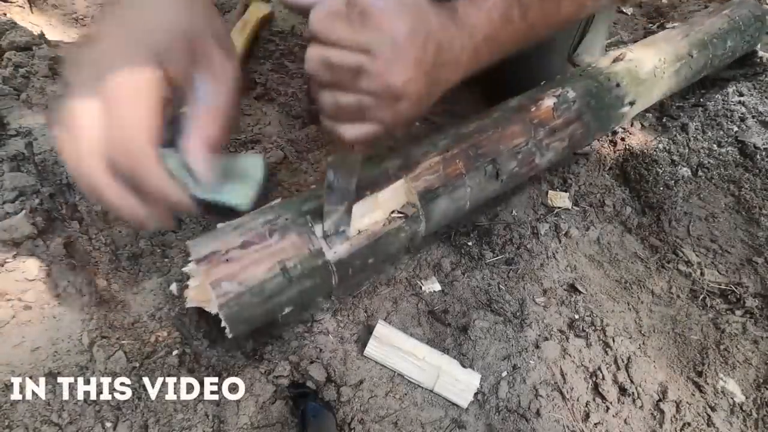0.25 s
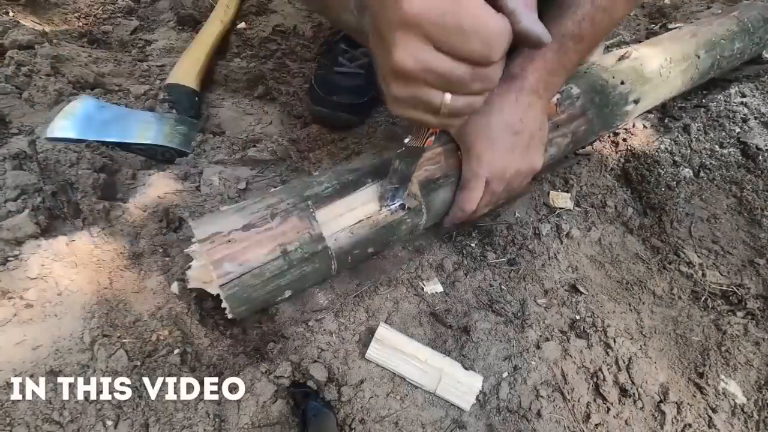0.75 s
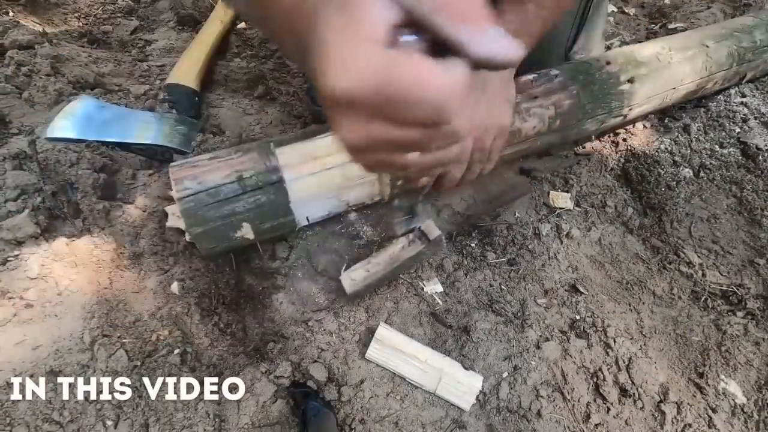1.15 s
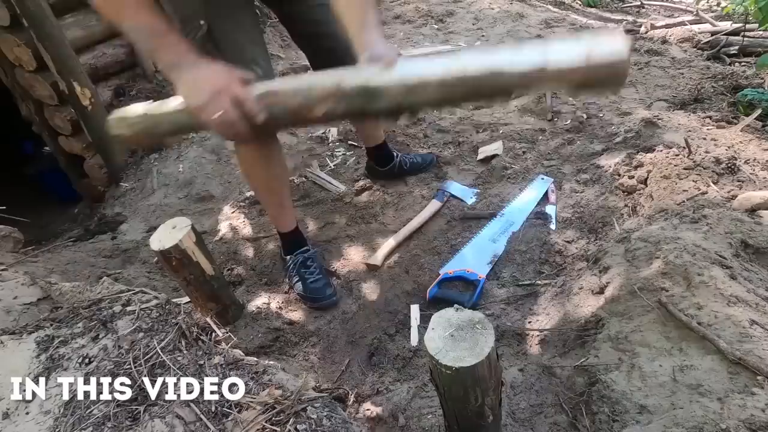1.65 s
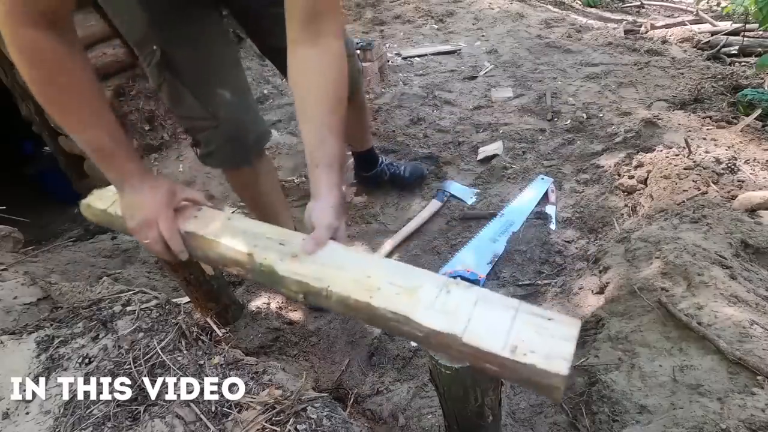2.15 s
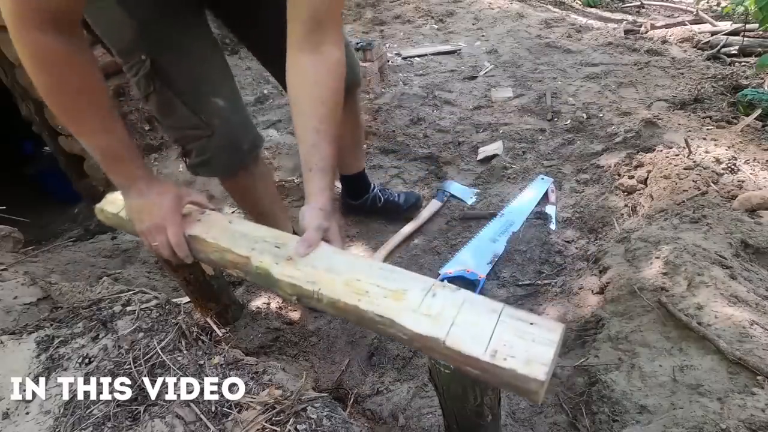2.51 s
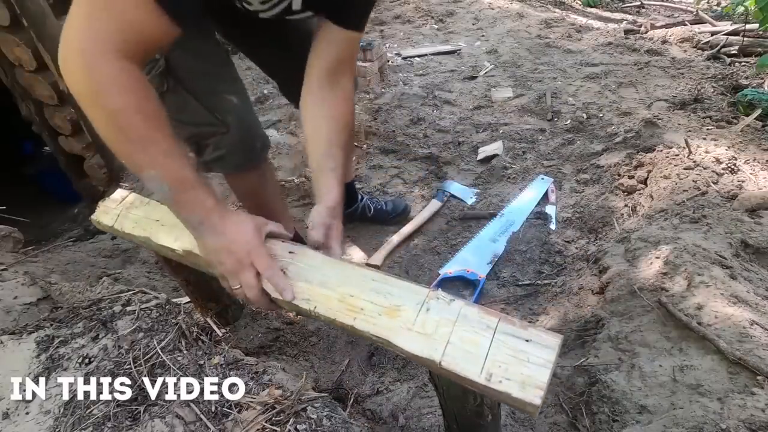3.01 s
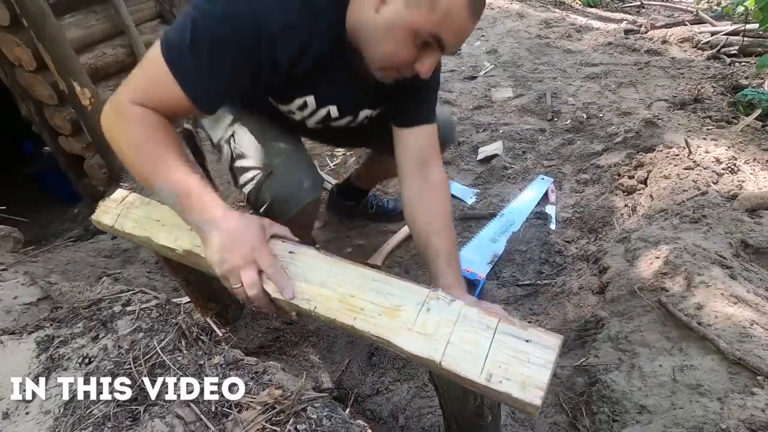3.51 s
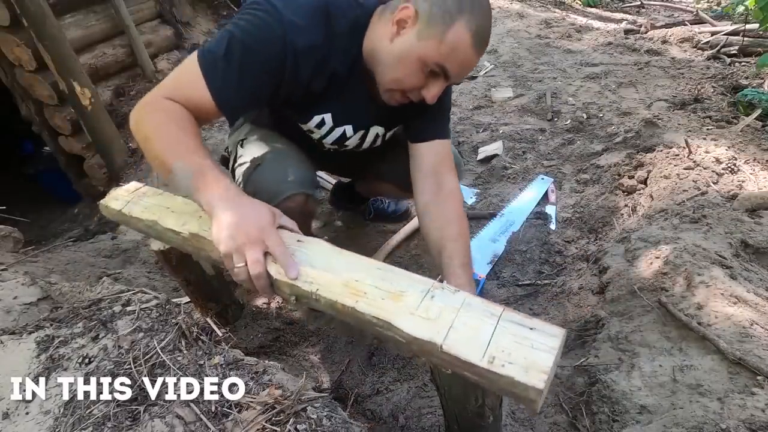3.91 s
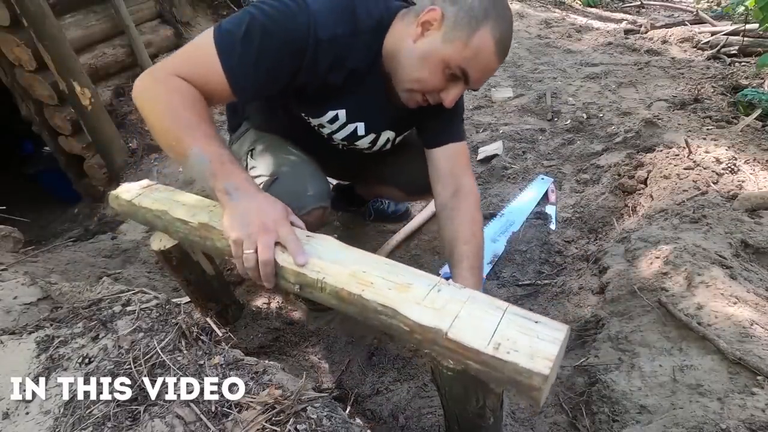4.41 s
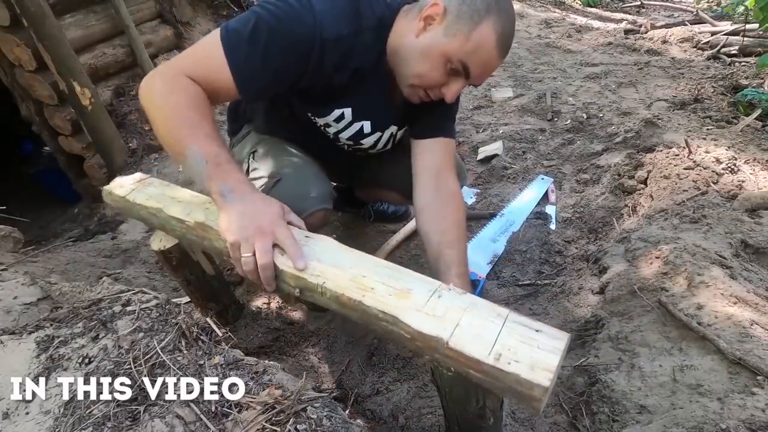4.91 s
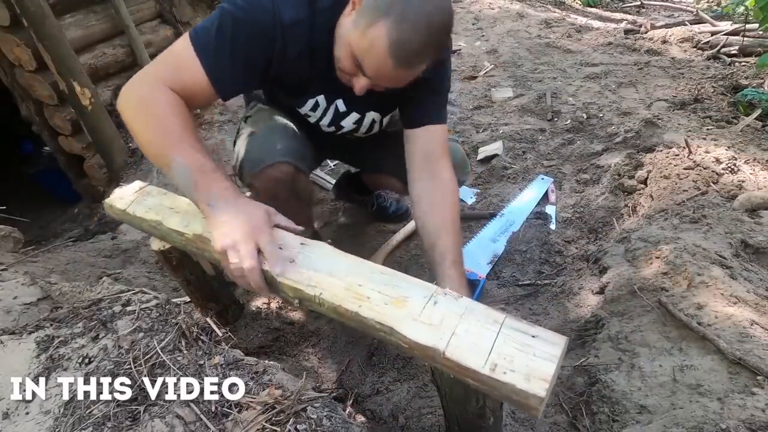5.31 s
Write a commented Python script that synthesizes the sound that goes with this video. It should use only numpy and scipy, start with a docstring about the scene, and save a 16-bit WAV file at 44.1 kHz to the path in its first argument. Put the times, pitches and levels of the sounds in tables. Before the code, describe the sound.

A chisel tears a block from a log with a loud snap, then a heavy beam knocks and rubs onto stumps in a quiet forest.

```python
"""A quiet forest murmurs around woodwork on bare earth, close by, amid scuffs and rustling clothes.
A chisel levers a block out of a notched log: fibres tick, tear and snap, and the block drops.
Then a hewn beam is set on two stumps, rocked and knocked into its seat, rubbing on hands and bark.
Solid bodies are sums of damped modes, soil thuds are heavily damped swings, and tearing, scraping
and crunching are dense random clicks filtered by the material."""
import sys
import numpy as np
from scipy import signal
from scipy.fft import rfft, irfft
from scipy.io import wavfile

SR = 44100
rng = np.random.default_rng(int(sys.argv[2]) if len(sys.argv) > 2 else 0)


def wav_record(signal):
    """Record a signal, one row per channel, as 16-bit PCM in the file named by sys.argv[1]."""
    frames = np.transpose(np.atleast_2d(signal))
    bounded = np.clip(frames, -1, 1)
    # unit amplitude maps onto the largest positive 16-bit level
    quanta = np.round(bounded * 32767).astype(np.int16)
    wavfile.write(sys.argv[1], SR, quanta)


N = 244898
TIME = np.arange(N) / SR  # s
SHORT = TIME[:16384]  # s, time axis of one short event
SIZE = 4096  # samples in a filter response

# beam meets stump: (time [s], beam drive [dB], contact cut-off [Hz], contact place [share of length],
# stump drive [dB], bark crunch peak [dB], crunch centre [Hz], jolt [dB], sinking [dB], sinking pitch [Hz])
KNOCKS = [(2.257, -19.5, 908, 0.108, -36, -24, 1700, -15.5, -14.5, 124),
          (2.3356, -44, 920, 0.055, -53, -48, 1300, -31, -22.5, 118),
          (2.4340, -24.5, 2197, 0.076, -15.5, -29.5, 1400, -27, -25, 109),
          (2.567, -48, 2980, 0.043, -34, -33, 1650, -24, -26.5, 88),
          (4.1783, -42, 2520, 0.031, -33, -33, 1400, -27, -30, 92),
          (5.223, -23.5, 1950, 0.15, -10.5, -19.5, 2750, -12, -25, 76)]
# spectrum of a scrape or rustle before tilting: (frequency [Hz], level [dB])
SCUFF_COLOUR = [(100, -4), (600, -10), (1200, 2), (2000, 3.5), (3200, 3.5), (5000, 0.5), (8000, -9),
                (11000, -17.5), (16000, -36.5)]
# spectrum of trembling soil: (frequency [Hz], level [dB])
SOIL_COLOUR = [(20, -19.5), (50, -2), (110, -4.5), (220, -11), (400, -18), (900, -31), (3000, -60.5)]


def undb(db):
    """Level is logarithmic: decibels to amplitude gain."""
    return 10 ** (np.asarray(db) / 20)


def unit(x):
    """Root-mean-square normalisation: scale to rms 1."""
    return x / np.sqrt(np.mean(x ** 2))


def peak(x, db):
    """Peak normalisation: scale the largest sample to a level in dB."""
    return x * undb(db) / np.abs(x).max()


def add(out, s, x):
    """Superposition: mix x in from time s."""
    i = max(int(s * SR), 0)
    out[:, i:i + x.shape[-1]] += x[..., :max(N - i, 0)]


def through(x, response):
    """Linear filtering: convolve both channels with an impulse response."""
    return signal.fftconvolve(x, response[None], axes=1)[:, :x.shape[1]]


def colour(points, tilt=0):
    """Minimum-phase response of a (Hz, dB) spectrum, tilted by dB per octave above 500 Hz."""
    hz, db = np.transpose(points)
    f = np.maximum(np.fft.rfftfreq(SIZE, 1 / SR), 1)
    level = np.interp(np.log(f), np.log(hz), db) + tilt * np.log2(np.maximum(f / 500, 1))
    # folding the cepstrum onto positive times makes the response causal
    cepstrum = irfft(np.log(undb(level)))
    cepstrum[1:SIZE // 2] *= 2
    cepstrum[SIZE // 2 + 1:] = 0
    return irfft(np.exp(rfft(cepstrum)))


def fade(t60):
    """Exponential decay: 60 dB are lost in t60 seconds."""
    return np.exp(-np.log(1000) * SHORT / t60)


def swell(t, rise, fall):
    """Exponential growth and decay: peaks at t = 0, gains 20 dB in rise s, loses them in fall s."""
    return undb(-20 * np.maximum(-t / rise, t / fall))


def waver(rate):
    """Random modulation: normal random levels joined by straight lines, rate of them a second."""
    points = rng.standard_normal(N // 8)
    return np.interp(TIME * rate, np.arange(len(points)), points)


def wobble(hz, rise):
    """Heavily damped oscillation: the envelope peaks after rise seconds and then dies."""
    return SHORT / rise * np.exp(1 - SHORT / rise) * np.sin(2 * np.pi * hz * SHORT)


def grains(count, spread_db, side):
    """Impulsive noise: dense clicks of very uneven size, partly different in the two channels."""
    size = np.minimum(rng.exponential(size=count), 6)
    mid, diff = rng.standard_normal((2, count)) * undb(spread_db * size)
    return unit(np.array([mid + side * diff, mid - side * diff]))


def air(spectrum, db):
    """Filtered noise: faint murmur that wavers, its treble almost unrelated left and right."""
    waver_db = 1.1
    mid, side = rng.standard_normal((2, N))
    side = through(side[None], colour([(100, -5), (1400, -6.5), (4000, 1), (8000, -1)]))[0]
    murmur = unit(through(np.array([mid + side, mid - side]), colour(spectrum)))
    return murmur * undb(db + waver_db * waver(10))


def forest():
    """Background noise depends on position: one murmur at the log, then another at the beam."""
    # spectrum of the forest air at the log: (frequency [Hz], relative level [dB])
    log_air = [(15, -30), (25, -0.5), (57, -4), (93, -19.5), (172, 2), (404, -15), (529, -9), (811, -22.5),
               (1310, -10.5), (1630, -21.5), (3180, -26), (3830, -30.5), (15000, -42.5)]
    # spectrum of the forest air at the beam: (frequency [Hz], relative level [dB])
    beam_air = [(15, -37.5), (25, -0.5), (98, -10.5), (176, 3), (271, -4.5), (363, -3), (543, -3.5),
                (833, -11.5), (1150, -6), (1760, -14.5), (3090, -23.5), (5570, -25.5), (11500, -40),
                (12800, -48.5), (15000, -63.5)]
    beam_start_s = 1.734
    return np.where(TIME < beam_start_s, air(log_air, db=-70), air(beam_air, db=-62))


def friction(s, rise, fall):
    """Stick-slip: a second of jerky grit, with a swelling pressure; gives start time, grit, pressure."""
    start = max(s - .5, 0)
    grit = grains(SR, spread_db=3.0, side=.4) * undb(2.5 * waver(130)[:SR])
    return start, grit, swell(start + TIME[:SR] - s, rise, fall)


def scuffing():
    """Sliding friction: scrapes and rustles hiss and rumble, and single bits of grit and twig crack."""
    # shoes, tools and the falling block scraping soil, and clothes rustling: (time of the height [s],
    # rise by 20 dB [s], fall by 20 dB [s], level [dB], tilt [dB per octave], low rumble re the hiss [dB])
    scuffs = [(0.01, .03, .26, -62, -3, 1), (0.253, .026, .06, -59.5, 3.5, -6),
              (0.51, .12, .055, -58, -2, 2), (0.560, .025, .014, -60, -.5, -6),
              (1.07, .012, .17, -55, -5, -6), (1.27, .25, .12, -67, 0, 3),
              (1.478, .025, .065, -59.5, 1.5, -12), (1.736, .0032, .12, -54.5, 0, -22),
              (2.0, .3, .62, -64, -8, -14), (2.78, .08, .093, -68, 4.5, -12), (3.75, .35, .5, -66, 2, -15),
              (4.835, .06, .08, -45.5, -.7, -1), (5.0, .06, .1, -65, 2, -12)]
    # grit and twigs cracking: (time [s], peak [dB], t60 [s])
    ticks = [(4.578, -50.5, .014), (4.641, -50, .014), (4.6884, -33, .016), (5.0433, -35, .014),
             (5.263, -39, .045), (5.411, -42, .014), (5.44, -40, .02)]
    # spectrum of a crack: (frequency [Hz], level [dB])
    tick_colour = [(300, -42), (1200, -15), (2600, 7.5), (3700, -6.5), (5500, 0), (8000, -12), (12000, -14),
                   (16000, -23.5)]
    out, soil, click = np.zeros((2, N)), colour(SOIL_COLOUR), colour(tick_colour)
    for s, rise, fall, db, tilt, rumble_db in scuffs:
        start, grit, pressure = friction(s, rise, fall)
        hiss = unit(through(grit, colour(SCUFF_COLOUR, tilt)))
        rumble = unit(through(grit, soil))
        add(out, start, undb(db) * pressure * (hiss + undb(rumble_db) * rumble))
    for s, db, t60 in ticks:
        crack = grains(len(SHORT), spread_db=0, side=0.61) * fade(t60)
        add(out, s, peak(through(crack, click), db))
    return out


def thud(hz, cycles):
    """Scaling by period: the ground peaks after a set number of swings, so low thuds last longer."""
    return wobble(hz, cycles / hz)


def thudding():
    """Damped spring: the soil takes each load with a few slow swings and trembles on briefly."""
    # log, block or foot landing on the soil: (time [s], envelope peak of the swing [dB], pitch [Hz])
    thuds = [(0.289, -44, 88), (0.499, -30.5, 98), (0.524, -26, 72), (1.016, -26, 290), (1.03, -28, 67),
             (1.125, -32.5, 210), (1.168, -46, 118), (1.257, -44.5, 182), (2.524, -37.5, 125),
             (4.831, -26, 122)]
    soil_rise, stump_rise = .47, .56  # swings to the peak
    jolt_hz, sink_lag_s = 208, .004
    rebound_s, rebound_db = .0385, -16  # after the knock, re the sinking
    tremble_db, tremble_t60_s = -24, .26  # level re the swing
    break_to_shudder_s, shudder_db, shudder_t60_s = .02, -43, .65
    out, soil = np.zeros((2, N)), colour(SOIL_COLOUR)
    loads = [(s, db, thud(hz, soil_rise)) for s, db, hz in thuds]
    # under every knock the stump jolts, sinks into the soil and rebounds once
    for s, *_, jolt_db, sink_db, sink_hz in KNOCKS:
        sink = thud(sink_hz, stump_rise)
        loads.append((s, jolt_db, thud(jolt_hz, stump_rise)))
        loads.append((s + sink_lag_s, sink_db, sink))
        loads.append((s + rebound_s, sink_db + rebound_db, sink))
    for s, db, swing in loads:
        tremble = unit(through(grains(len(SHORT), 0, side=0.6), soil))
        tremble = tremble * fade(tremble_t60_s) * (1 - np.exp(-SHORT / .008))
        add(out, s, undb(db) * (swing + undb(tremble_db) * tremble))
    # the long log keeps shuddering on the ground after the block lets go
    shudder = unit(through(grains(len(SHORT), 0, side=.5), soil)) * fade(shudder_t60_s)
    add(out, BREAK_S + break_to_shudder_s, undb(shudder_db) * shudder)
    return out


def blade_ring():
    """Modal superposition: the chisel blade responds as a sum of decaying sines."""
    # modes of the blade: (frequency [Hz], level [dB], t60 [s])
    blade = [(2030, 0, .07), (6850, -10, .06), (7150, -11, .05)]
    return sum(undb(db) * fade(t60) * np.sin(2 * np.pi * hz * SHORT) for hz, db, t60 in blade)


def chisel():
    """Impact excitation: the blade bites into the log with a gritty tick and rings briefly."""
    # the blade is set against the wood: (time [s], reference level [dB])
    taps = [(0.489, -44), (0.513, -48)]
    out = np.zeros((2, N))
    for s, db in taps:
        bite = grains(len(SHORT), spread_db=2.5, side=.3) * fade(.035)
        add(out, s, peak(through(bite, blade_ring()), db - 3))
        add(out, s, peak(through(bite, colour(SCUFF_COLOUR, tilt=-4)), db + 1))
    return out


BREAK_S = 1.014  # the block lets go


def burst(t60, tail_db, side):
    """Cascading fracture: a sharp break followed by a dying spray of smaller ones."""
    spray = grains(len(SHORT), 1.4, side) * fade(t60)
    spray *= undb(tail_db) / np.sqrt(np.sum(spray[0] ** 2))
    spray[:, 0] += 1
    return spray


def log_ring(tilt, cut_hz):
    """Modal resonance: the notched log rings, tilted in dB per octave and thinned below cut_hz."""
    # resonances of the log: (frequency [Hz], bandwidth [Hz], level [dB])
    resonances = [(570, 77, -8.5), (980, 200, -4.5), (1670, 230, 0.5), (2265, 190, -9), (3120, 850, -2),
                  (3050, 200, 4), (3170, 220, 0.5), (3860, 200, -17), (4800, 500, -19), (7670, 600, -15),
                  (8000, 1700, -8.5), (11100, 1700, -23.5)]
    ring = np.zeros(len(SHORT))
    for k, (hz, width, db) in enumerate(resonances):
        decay = np.exp(-np.pi * width * SHORT)
        ring += undb(db) * width * decay * np.sin(2 * np.pi * hz * SHORT + k)
    low_cut = colour([(cut_hz / 4, -36), (cut_hz, 0), (16000, 0)], tilt)
    return signal.fftconvolve(ring[:SIZE], low_cut)[:SIZE]


def splitting():
    """Progressive fracture: fibres tear in jerks, ever louder until the block snaps off, ringing the log."""
    # the thickest fibres snapping: (time [s], peak [dB])
    snaps = [(0.8785, -34.5), (0.9425, -24), (0.9558, -16.5), (0.9640, -27), (0.9763, -33), (1.0140, 2.5),
             (1.0175, -14), (1.0325, -18.5), (1.0665, -25), (1.2581, -42.5), (1.2725, -44), (1.3335, -52)]
    snap_tilt, snap_dulling = -1.8, .03  # dB per octave at 0 dB, and its fall per dB of strength
    held_cut_hz, free_cut_hz = 1300, 230  # a snap has no body while the block is still held
    fine_early, fine_late, coarsen_s = .55, .25, .12  # power share of fine, bright fibres
    rush_db, sing_db = -24, -10  # blade singing re the rush
    t = TIME - BREAK_S
    # a slow creep and a last rush both peak at the break
    creep = undb(-47) * swell(t, rise=.18, fall=.105)
    rush = undb(rush_db) * swell(t, rise=.024, fall=.027)
    level = creep + rush
    # fine fibres go first, coarse ones last
    share = np.clip(np.interp(t, [-coarsen_s, 0], [fine_early, fine_late]), 0, 1)
    fine = unit(through(grains(N, spread_db=6, side=.35), log_ring(tilt=4, cut_hz=520)))
    coarse = unit(through(grains(N, spread_db=5, side=0.25), log_ring(tilt=-7.0, cut_hz=1600)))
    # only the heaviest tearing shakes the whole log
    body_colour = colour([(40, -8.5), (280, 1), (450, -12.5), (900, -3.5), (2000, -24)])
    body = unit(through(grains(N, 2, side=0.49), body_colour))
    # splinters brush past each other
    brush = unit(through(grains(N, spread_db=5, side=.4), colour(SCUFF_COLOUR, tilt=1.5)))
    jerks = undb(3.6 * waver(260))
    wood = np.sqrt(share) * fine + np.sqrt(1 - share) * coarse
    wood += undb(-11) * np.sqrt(level / level.max()) * body
    out = wood * (rush + undb(-2) * creep) + undb(-4.5) * brush * creep
    out *= jerks
    # the blade sings at its high modes while it is under load
    sing = through(grains(N, spread_db=2.5, side=.4), blade_ring())
    sing = unit(through(sing, colour([(2500, -45), (6500, 0)])))
    out += undb(rush_db + sing_db) * swell(t + .006, rise=.025, fall=.02) * sing
    for s, db in snaps:
        cut_hz = held_cut_hz if s < BREAK_S - .01 else free_cut_hz
        ring = log_ring(snap_tilt - snap_dulling * db, cut_hz)
        add(out, s, peak(through(burst(t60=.022, tail_db=-6.5, side=0.3), ring), db))
    return out


def whine():
    """Band-filtered noise: a faint, far whine near 1.3 kHz swells and fades once."""
    height_s, height_db, lose_10_db_s = 1.96, -59.5, .18
    band = colour([(700, -41), (1150, -13.5), (1320, 0), (1500, -11.5), (2400, -43)])
    tone = unit(through(grains(N, 0, side=0.42), band))
    return tone * undb(height_db - 10 * ((TIME - height_s) / lose_10_db_s) ** 2)


def knocking():
    """Modal excitation: each contact bends the beam, rocks the stump and crushes a little bark."""
    # bending modes of the beam: (frequency once seated [Hz], level [dB], t60 before the ring factor [s])
    modes = [(455, -7, .06), (606, 0, .085), (790, -15, .05), (935, -11, .056), (1112, -1, .085),
             (1260, -9, .04), (1450, -7, .04), (1615, -2, .05), (1890, -17, .05), (2420, -6, .04),
             (2800, -6, .03), (3250, -7, .025)]
    # spectrum of crushed bark: (frequency [Hz], level [dB])
    bark_colour = [(200, -24), (1300, 7), (2000, 0.5), (2900, 1.5), (3900, -6.5), (5100, -2.5),
                   (6500, -17.5), (8500, -18), (14000, -35)]
    seated_s = 2.4
    loose_pitch, loose_ring, seated_ring = .975, 1.2, .85  # factors on frequency and ring time
    stump_hz, stump_rise_s = 333, 0.006  # pitch once seated
    crunch_focus_db = 10.5
    out, bark = np.zeros((2, N)), colour(bark_colour)
    for s, db, contact_hz, place, stump_db, bark_db, bark_hz, *_ in KNOCKS:
        # the beam rings lower and longer until both ends are seated
        pitch, length = (loose_pitch, loose_ring) if s < seated_s else (1, seated_ring)
        for k, (hz, mode_db, t60) in enumerate(modes):
            # a mode hit near its node stays weak, and a soft contact hardly excites the high ones
            shape = 0.19 + abs(np.sin(np.pi * (k + 2) * place))
            drive = shape / (1 + (hz / contact_hz) ** 2)
            onset = 1 - np.exp(-SHORT / .001)
            ring = fade(t60 * length) * onset * np.sin(2 * np.pi * hz * pitch * SHORT)
            add(out, s, (-1) ** k * undb(db + mode_db) * drive * ring)
        add(out, s, undb(stump_db - 3) * wobble(stump_hz * pitch, stump_rise_s))
        crunch = grains(len(SHORT), spread_db=3.5, side=0.26) * (fade(0.02) + undb(-22.5) * fade(0.14))
        # each patch of bark gives way around a pitch of its own
        patch = colour([(0.54 * bark_hz, 0), (bark_hz, crunch_focus_db), (1.49 * bark_hz, 0)])
        add(out, s, peak(through(through(crunch, bark), patch), bark_db))
    return out


def rubbing():
    """Friction-driven resonance: sliding on the beam hisses, and pressure makes one mode squeak."""
    # hands and stumps sliding along the beam: (time of the height [s], rise by 20 dB [s],
    # fall by 20 dB [s], level [dB], tilt [dB per octave], squeak re the rub at full pressure [dB])
    rubs = [(2.366, .004, .04, -52.5, -.5, 4), (2.41, .07, .12, -51, -3, -4),
            (3.038, .002, .13, -58, 6, -15), (3.10, .058, .19, -56.5, 4, -4),
            (3.227, .045, .033, -57, 6, 8), (3.414, .021, .074, -53, 6, 5),
            (4.074, .085, .05, -48.5, -6, -3), (5.443, .008, .026, -50.5, 3, 0),
            (5.55, .092, .056, -50, 3, -10)]
    squeak_hz, squeak_t60_s = 1130, .06  # the beam mode that rubbing excites
    mode = fade(squeak_t60_s) * np.sin(2 * np.pi * squeak_hz * SHORT)
    out = np.zeros((2, N))
    for s, rise, fall, db, tilt, squeak_db in rubs:
        start, grit, pressure = friction(s, rise, fall)
        rub = unit(through(grit, colour(SCUFF_COLOUR, tilt)))
        squeak = np.sqrt(pressure) * unit(through(grit, mode))
        add(out, start, undb(db) * pressure * (rub + undb(squeak_db) * squeak))
    return out


def scatter(work):
    """Diffuse scattering: trunks and ground return the work as a thin decaying noise tail."""
    tail_t60_s = .5
    tail = rng.standard_normal((2, len(SHORT))) * fade(tail_t60_s) * (SHORT > .004)
    tail = through(tail, colour([(100, -5), (3000, -5.5), (12000, -11.5)]))
    tail /= np.sqrt(np.sum(tail[0] ** 2))
    return signal.fftconvolve(work, tail, axes=1)[:, :N]


def scene():
    """Superposition: all the work, its thin scatter, the forest air and the far whine."""
    work = scuffing() + thudding() + chisel() + splitting() + knocking() + rubbing()
    return work + undb(-37) * scatter(work) + forest() + whine()


def record(dry):
    """Two-port pickup: the left hears slightly later and louder; peaks clip and the top is cut."""
    top_hz = 15800
    left = np.append(0, dry[0, :-1]) * undb(.55)  # one sample late
    right = dry[1] * undb(-.55)
    ports = np.clip(np.array([left, right]), -1, 1)
    low_pass = signal.ellip(8, .2, 70, top_hz, fs=SR, output="sos")
    return signal.sosfilt(low_pass, ports)


dry = scene()
out = record(dry)
wav_record(out)
```